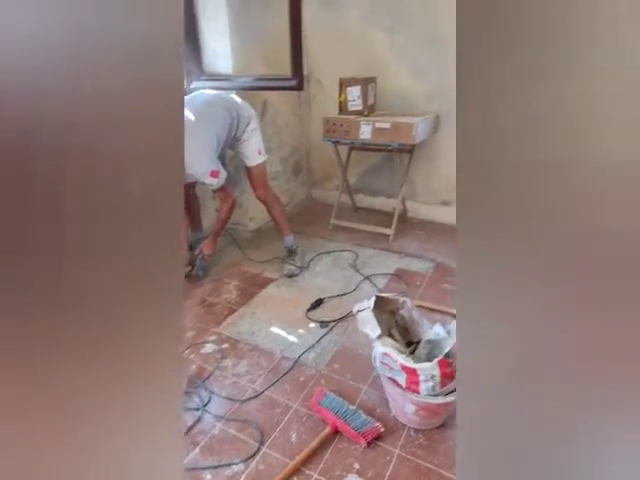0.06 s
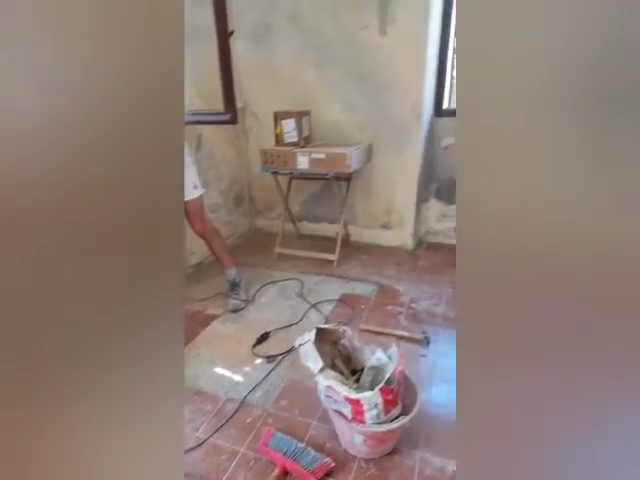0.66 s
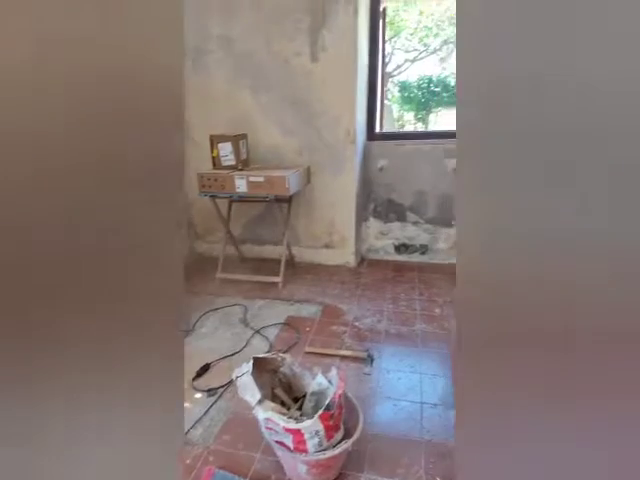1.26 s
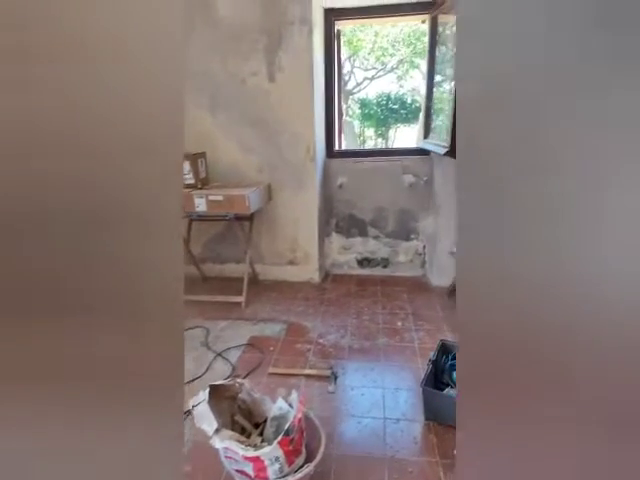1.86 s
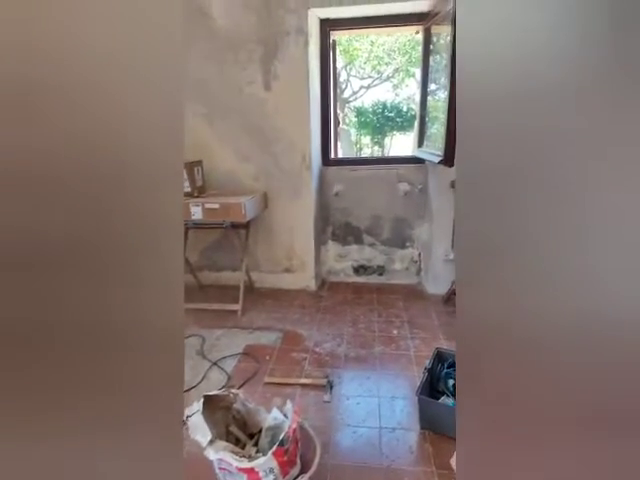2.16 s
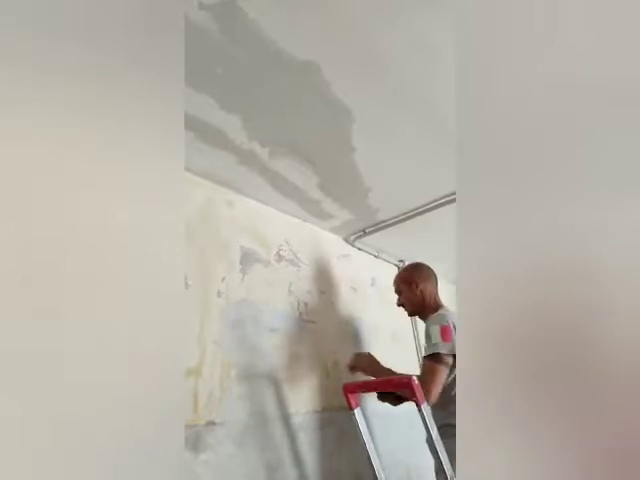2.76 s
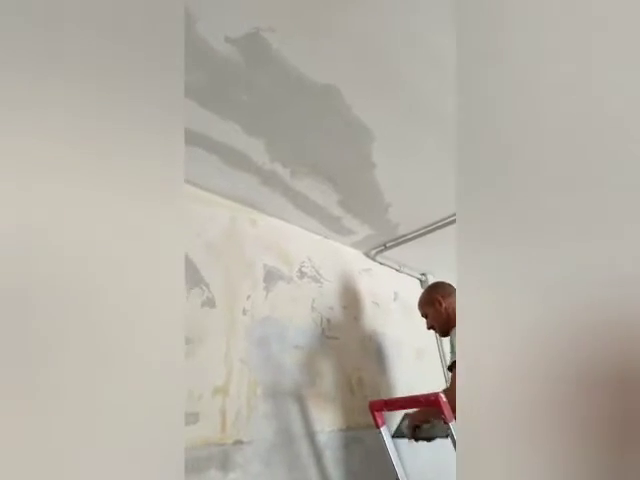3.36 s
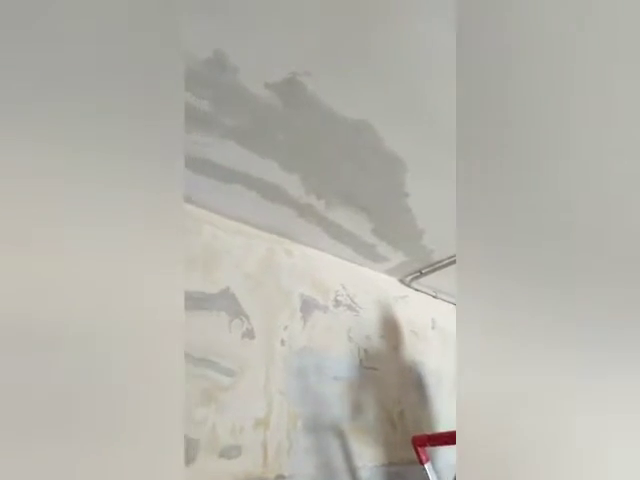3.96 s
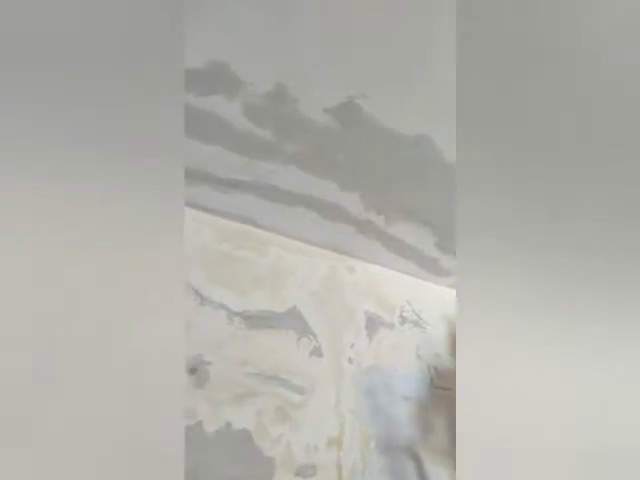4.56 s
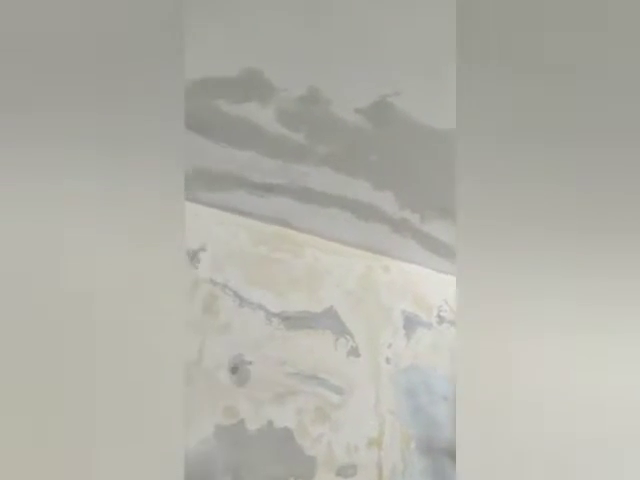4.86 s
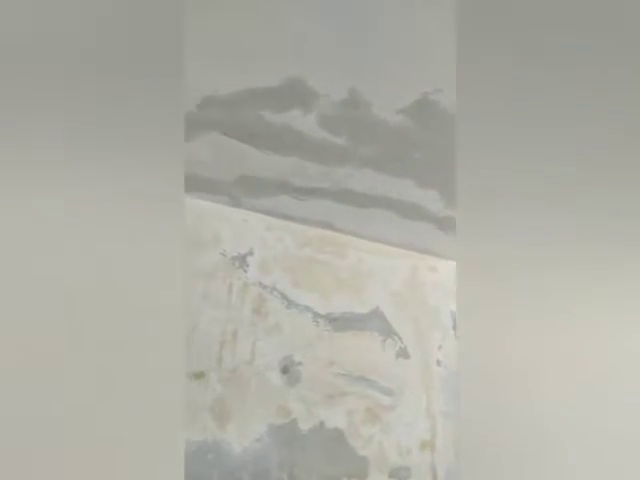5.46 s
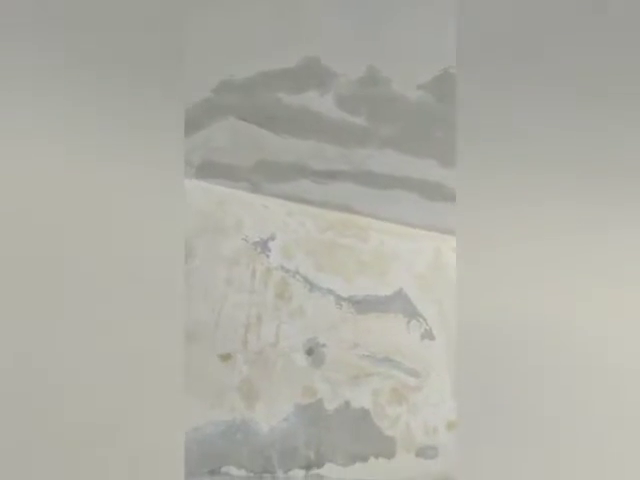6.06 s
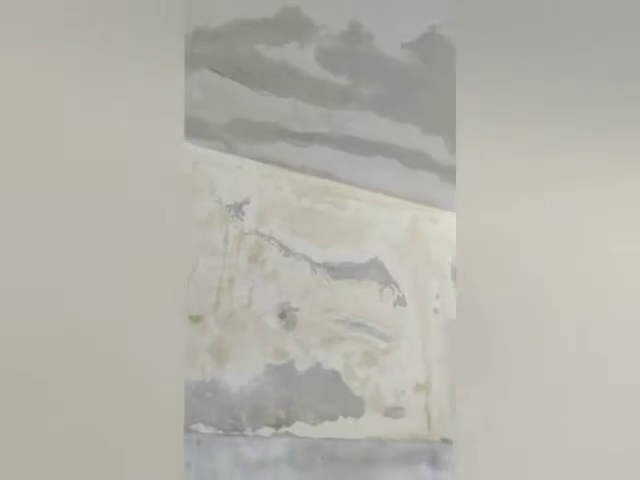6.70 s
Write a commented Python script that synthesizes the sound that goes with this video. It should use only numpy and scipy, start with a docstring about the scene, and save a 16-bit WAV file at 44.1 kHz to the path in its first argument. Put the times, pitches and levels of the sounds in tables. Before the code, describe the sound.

First comes the loud, high whine of an angle grinder under load, with hissing grit and wavering lower tones. It stops dead, and a steel trowel takes over, far softer, spreading plaster in brief rasping strokes and knocking on a tub several times. Bare walls echo each scrape and knock. The last moments hold only very faint scraping, quiet room air and a slight low handling bump.

```python
"""A bare room with a tiled floor: an angle grinder bites in, grit hisses and the steel disc rings in many
shrill modes over a low, uneven howl. A hard cut leads to another bare room, where a steel trowel
knocks against a tub and spreads plaster on the wall in short strokes. Sand hisses under the rasping
blade, and the hard walls echo each stroke and knock over a quiet room tone."""
import sys
import numpy as np
from scipy import signal
from scipy.fft import rfft, irfft, next_fast_len
from scipy.io import wavfile
from scipy.ndimage import uniform_filter1d, map_coordinates

SR = 44100
rng = np.random.default_rng(int(sys.argv[2]) if len(sys.argv) > 2 else 0)


def waveform_to_disk(signal):
    """Save audio, clipped to [-1, 1], as 16-bit WAV at the path in sys.argv[1]."""
    frames = np.transpose(np.atleast_2d(signal))
    scaled = np.clip(frames, -1, 1) * 32767
    samples = np.round(scaled).astype(np.int16)
    wavfile.write(sys.argv[1], SR, samples)


N = 296793


def amp(db):
    """Decibels to gain."""
    return 10 ** (np.asarray(db) / 20)


def unit(x):
    """x at rms 1."""
    return x / np.sqrt(np.mean(x ** 2) + 1e-20)


def clock():
    """The time of each sample in seconds."""
    return np.arange(N) / SR


def along(points, hz):
    """Read (f/Hz, value) breakpoints on a log frequency axis."""
    f, v = np.transpose(points)
    return np.interp(np.log(hz + 1), np.log(f + 1), v)


def automation(points):
    """Join (t/s, value) breakpoints into one value per sample."""
    return np.interp(clock(), *np.transpose(points))


def wobble(rate):
    """A smooth random modulator, rate knots a second."""
    knots = rng.standard_normal(int(N * rate / SR) + 4)
    coarse = np.arange(0, N, 32) / SR
    return np.interp(clock(), coarse, map_coordinates(knots, [coarse * rate]))


def filtered(x, response):
    """x through a filter whose gain is response(hz)."""
    size = next_fast_len(N + SR // 4)
    return irfft(rfft(x, size) * response(np.fft.rfftfreq(size, 1 / SR)), size)[..., :N]


def coloured(x, spectrum):
    """x through an EQ curve, brought to rms 1."""
    return unit(filtered(x, lambda hz: amp(along(spectrum, hz))))


def diffuse(alike):
    """Stereo noise whose sides share the fraction alike of their power."""
    left, right, both = rng.standard_normal((3, N))
    return np.sqrt(1 - alike) * np.array([left, right]) + np.sqrt(alike) * both


def patchy(x, depth_db, size=512, count=9):
    """Brief random resonances, as from a moving source in a room; each spans about count frames."""
    spectra = signal.stft(x, nperseg=size)[2]
    field = uniform_filter1d(rng.standard_normal(spectra.shape[1:]), 2, axis=0)
    field = uniform_filter1d(field, count, axis=1)
    return signal.istft(spectra * amp(depth_db * unit(field)), nperseg=size)[1][:, :N]


def resonance(hz, centre, width):
    """A single causal resonance, gain 1 at its centre."""
    return 1j * hz * width / (centre ** 2 - hz ** 2 + 1j * hz * width)


def panned(x, pan_db):
    """Left louder than right by pan_db."""
    return x * amp([[pan_db / 2], [-pan_db / 2]])


def modes(table, skirt):
    """Yield each mode's frequency and its complex stereo ringing under a steady rain of grit."""
    size = next_fast_len(N // 4 + 1) * 4
    hz = np.fft.rfftfreq(size, 1 / SR)
    blows = rfft(diffuse(alike=0.065), size)
    for centre, width, db in table:
        shape = resonance(hz, centre, width) * resonance(hz, centre, skirt * width) ** 2
        yield centre, amp(db) * np.fft.ifft(blows * shape, size)[:, :N]


def sustained(mode, hold_s=0.028):
    """Friction feeds a mode as fast as it dies, which evens out its strength."""
    power = uniform_filter1d(np.mean(np.abs(mode) ** 2, axis=0), int(hold_s * SR))
    return mode * np.cbrt(power.mean() / (np.abs(power) + 1e-20))


def grit(turn, rub_db=1.1, trim_db=2):
    """Grinding hiss whose colour flickers with brief random resonances."""
    # how hard the disc bites: t/s, level/dB
    bite = [(0.0, -15.5), (0.01, -22.5), (0.12, -19), (0.13, -20.5), (0.35, -23), (0.38, -19.5),
            (0.46, -20.5), (0.5, -18), (0.56, -19.5), (0.9, -20), (1.02, -21.5), (1.59, -19.5), (1.97, -20),
            (1.98, -18.5), (2.58, -20), (2.6, -19)]
    # EQ of the grinding noise: f/Hz, level/dB
    grit_eq = [(25, -10), (60, -12), (120, -17.5), (165, -3.5), (650, -4.5), (1100, 0), (1900, 0),
               (2900, 1), (3450, -7), (4050, -4.5), (4700, -19.5), (5500, -20), (8300, -41), (9200, -17),
               (15000, -19)]
    fine = patchy(diffuse(alike=0.1), depth_db=2.6, size=4096, count=3)
    flickering_hiss = patchy(fine, depth_db=2.0, size=1024, count=4)
    rub = amp(rub_db * np.sin(2 * turn))  # the rim rubs harder twice a turn
    return amp(automation(bite) + trim_db) * coloured(flickering_hiss * rub, grit_eq)


def draught(start_db=-41.5, rise_db_per_s=2.5, flutter_db=2.2):
    """Air thrown by the disc: a fluttering rumble that slowly builds."""
    # EQ of the moving air: f/Hz, level/dB
    draught_eq = [(20, 5.5), (35, -2.5), (65, -13), (120, -17.5), (400, -48)]
    gusts_db = start_db + rise_db_per_s * clock() + flutter_db * wobble(11)
    return amp(gusts_db) * coloured(diffuse(alike=0.18), draught_eq)


def disc(turn, drift_hz=6, bend_hz=7.5, swell_db=1.8, top_db=-26):
    """Grit keeps the disc ringing; its modes bend and swell as the rim binds, and spin adds sidebands."""
    # modes of the steel disc: f/Hz, width/Hz, level/dB
    disc_modes = [(3810, 50, -10), (4385, 60, -8), (4470, 95, -4.5), (4620, 50, -7), (4928, 42, -3),
                  (5061, 36, -2), (5383, 42, -2.5), (5540, 36, .5), (6072, 48, 1), (6710, 48, 3.5),
                  (6795, 70, 1.5), (6980, 90, -15), (7215, 70, -10), (7480, 95, -3), (7605, 48, 3),
                  (8520, 44, 2.5), (9582, 48, -8), (10385, 80, -17), (10766, 60, -8), (11980, 70, -16),
                  (12480, 75, -14.5), (13385, 60, -14.5), (14720, 110, -15)]
    # splits between the low, main, shrill and top groups of modes: f/Hz
    borders = [5800, 8000, 9000]
    # fader rides of the low, main and shrill groups: t/s, level/dB
    low_ride = [(0, -18.5), (.4, -19.5), (.6, -20.5), (.85, -18), (1.2, -19.5), (1.65, -18), (2.0, -20),
                (2.6, -18)]
    main_ride = [(0, -15.5), (.12, -14), (.3, -14), (.47, -12.5), (.8, -14), (1.1, -13.5), (1.42, -16),
                 (1.68, -14), (2.6, -15)]
    shrill_ride = [(0, -21.5), (.55, -23.5), (.83, -17), (1.15, -17), (1.35, -23), (1.7, -22.5),
                   (1.95, -22), (2.3, -19.5), (2.43, -16), (2.6, -17.5)]
    drift = drift_hz * wobble(3.6)
    groups = np.zeros((len(borders) + 1, 2, N))
    for centre, mode in modes(disc_modes, skirt=3.0):
        bend = 2 * np.pi * np.cumsum(drift + bend_hz * wobble(9)) / SR
        angle = turn + rng.uniform(0, 2 * np.pi)
        swing = .22 * np.sin(angle) + .08 * np.sin(2 * angle)  # radians, once and twice a turn
        ringing = (sustained(mode) * np.exp(1j * (bend + swing))).real
        groups[np.searchsorted(borders, centre)] += amp(swell_db * wobble(3.9)) * ringing
    levels_db = [automation(low_ride), automation(main_ride), automation(shrill_ride), top_db]
    ring = sum(amp(db) * unit(group) for db, group in zip(levels_db, groups))
    return ring.std() * unit(patchy(ring, depth_db=2.1, size=1024, count=4))


def guard(howl_db=-26.5, wander_db=3.5):
    """The low modes of disc and guard howl unevenly, and single tones sing out when the rim binds."""
    # low modes of disc and guard: f/Hz, width/Hz, level/dB
    guard_modes = [(802, 20, -2), (826, 20, -5), (902, 22, -3), (1131, 16, -1), (1160, 24, -1),
                   (1256, 16, -1.5), (1488, 25, -5), (1701, 28, -6), (1826, 14, -1), (1946, 12, 1),
                   (2189, 14, -3.5), (2604, 16, -5)]
    # tones of the binding rim: t/s, half length/s, f/Hz, level/dB
    binds = [(0.15, .06, 826, -35), (0.15, .06, 1165, -32.5), (0.16, .05, 1256, -33),
             (0.40, .055, 826, -30.5), (0.40, .055, 1165, -28.5), (0.61, .06, 1256, -32),
             (0.88, .09, 1351, -33.5), (0.89, .09, 1131, -25), (0.90, .075, 902, -28),
             (0.96, .13, 802, -32.5), (1.22, .05, 1256, -30), (1.29, .03, 802, -34),
             (1.37, .09, 1256, -32.5), (1.44, .055, 802, -29.5), (1.46, .08, 1150, -34),
             (1.60, .05, 1946, -30), (1.72, .075, 802, -29), (1.81, .04, 1701, -31.5),
             (2.02, .05, 1946, -33), (2.03, .04, 1600, -31.5), (2.05, .075, 1826, -28.5),
             (2.18, .13, 1140, -31.5), (2.25, .15, 1701, -30.5), (2.36, .05, 802, -32.5),
             (2.53, .06, 802, -33.5), (2.54, .08, 1701, -32)]
    t = clock()
    howl = sum(amp(wander_db * wobble(5.4)) * mode.real for _, mode in modes(guard_modes, skirt=6))
    phases = rng.uniform(0, 2 * np.pi, (len(binds), 2, 1))
    song = np.zeros((2, N))
    for (peak_s, half_s, hz, db), phase in zip(binds, phases):
        near = np.abs(t - peak_s) < np.pi * half_s
        swell = amp(db) * np.exp(-((t[near] - peak_s) / half_s) ** 2)
        ear_phase = phase[0] + phase / 4  # the two ears are a little out of step
        song[:, near] += swell * np.sin(2 * np.pi * hz * t[near] + ear_phase)
    return amp(howl_db) * unit(howl) + np.sqrt(2) * song


def grinder(spin_hz=112.5, waver_hz=2.2):
    """The whole tool, its spin wavering under load, spread across the stereo field by frequency."""
    # stereo balance of the grinder: f/Hz, left over right/dB
    balance = [(60, 2), (110, 9), (200, 1), (380, 6), (700, 1.5), (1280, 6.5), (2370, 0.5), (4370, 1),
               (8070, -2.5), (14900, 1.5)]
    turn = 2 * np.pi * np.cumsum(spin_hz + waver_hz * wobble(15)) / SR
    tool = grit(turn) + draught() + disc(turn) + guard()
    return filtered(tool, lambda hz: amp(np.outer([.5, -.5], along(balance, hz))))


def room_tone(level_db=-60.0, wander_db=2.2):
    """The still air of the house: a faint, low noise that wavers in level and colour."""
    # EQ of the still air: f/Hz, level/dB
    air_eq = [(10, 6), (30, 0.5), (65, -9.5), (120, -13), (180, -8), (260, -10.5), (335, -7), (420, -12),
              (550, -16.5), (1200, -21), (3000, -33), (7000, -27.5), (9000, -34), (11000, -56.5)]
    gain = amp(level_db + wander_db * wobble(10.0))
    air = patchy(diffuse(alike=0.45), depth_db=3.5, size=2048, count=4)
    return gain * coloured(air, air_eq)


def sand(grain_db=0.5, stick_db=0.7):
    """Sand dragged along: noise roughened quickly by its grains and more slowly by sticking."""
    drag = patchy(diffuse(alike=0.049), depth_db=5.5)
    return drag * amp(grain_db * wobble(650) + stick_db * wobble(60))


def crunch(per_s):
    """Single coarse grains of sand cracking under the blade, at rms 1."""
    return unit((rng.random(N) < per_s / SR) * rng.standard_normal((2, N)))


def pressure(age, length, swell_db, attack_s=0.035, release_s=0.04, ease_share=0.18):
    """One stroke: the blade lands (slower on long strokes), presses ever harder or softer, and lifts."""
    landing = np.clip(age / max(attack_s, ease_share * length), 0, 1)
    pressing = amp(swell_db * (np.clip(age / length, 0, 1) - .5))
    lifting = np.exp(-np.maximum(age - length, 0) / release_s)
    return landing * pressing * lifting


def trowel(crunch_db=-4, rasp_lag_s=0.0076, echo_db=-2.5):
    """Sand hisses first, then the blade rasps on the wall, ringing most in the early, hard strokes."""
    # trowel strokes: t/s, length/s, hiss level/dB, rasp level/dB, swell/dB, blade ring/ratio
    strokes = [(2.42, 0.074, -44, -46, 0, 1.1), (2.643, 0.079, -40, -37, 9.5, 1.9),
               (2.765, 0.13, -53, -46.5, 0, 0.78), (3.17, 0.29, -68.5, -66, -6, .45),
               (3.449, 0.048, -60, -55.5, 4, 0.55), (3.503, 0.19, -47, -50, -5, 0.15),
               (4.04, 0.083, -41.5, -48, 4.5, 0.15), (4.502, 0.048, -38, -44, 2, 0.22),
               (4.858, 0.18, -40, -44.5, 4, 0.12), (5.852, 0.44, -68, -69, -1.5, .1),
               (6.287, .43, -75, -80, 6, 0.4)]
    # EQs of the hissing sand and the rasping blade: f/Hz, level/dB
    hiss_eq = [(2000, -53), (3800, -9.5), (5400, -6), (7000, 1), (8000, -3.5), (9000, -10.5), (9700, -21),
               (12000, -24), (15000, -26.5)]
    rasp_eq = [(100, -37.5), (300, -13), (700, -7.5), (1400, 0.5), (2100, -1), (3200, -5), (4500, -4.5),
               (7000, -28.5)]
    # modes of the steel blade: f/Hz, width/Hz, level/dB
    blade = [(686, 22, 4), (870, 18, -2), (1933, 18, 0), (2013, 45, 4), (2105, 45, 1.5), (2509, 30, -4),
             (2832, 20, -4), (3822, 35, -2)]
    t = clock()
    grains = sand() + amp(crunch_db) * crunch(per_s=260)
    hiss = panned(coloured(grains, hiss_eq), pan_db=-3.0)
    rasp = panned(coloured(sand(), rasp_eq), pan_db=4.0)
    ringing = filtered(rasp, lambda hz: sum(amp(db) * resonance(hz, f, width) for f, width, db in blade))
    scrape = np.zeros((2, N))
    for start, length, hiss_db, rasp_db, swell_db, ring in strokes:
        steel = unit(rasp + ring * ringing)
        scrape += amp(hiss_db) * pressure(t - start, length, swell_db) * hiss
        scrape += amp(rasp_db) * pressure(t - start - rasp_lag_s, length, swell_db) * steel
    return scrape + amp(echo_db) * wall_echo(scrape)


def wall_echo(x):
    """Reverb of bare walls: each frequency dies at its own speed, with a separate tail for each ear."""
    # decay of the room: f/Hz, t60/s
    decay = [(100, 0.8), (500, 0.96), (1500, 0.85), (4000, 0.7), (7500, 0.67), (14000, 0.18)]
    hz, t, spectra = signal.stft(rng.standard_normal((2, SR)), SR, nperseg=256)
    fade = amp(-60 * t / along(decay, hz)[:, None])
    tail = signal.istft(spectra * fade, SR, nperseg=256)[1]
    return signal.fftconvolve(x, tail / np.linalg.norm(tail[0]), axes=1)[:, :N]


def knocks(thud_t60=0.081, click_t60=0.039, attack_s=0.0044, echo_db=5.0):
    """Dull thuds of the tub with a click of steel, heard mostly through the room."""
    # trowel hits on tub and wall: t/s, thud level/dB, click level/dB
    hits = [(2.651, -61, -28.5), (3.413, -45, -48), (3.952, -56, -38.5), (4.419, -60, -44),
            (4.443, -52, -44), (4.798, -39, -38), (4.845, -43.5, -55), (6.603, -62, -53.5)]
    # EQs of the thud and the click: f/Hz, level/dB
    thud_eq = [(60, -31.5), (170, 6.5), (550, 3), (1100, 1), (2200, -5), (5000, -31)]
    click_eq = [(600, -3), (1500, 9), (4000, 7), (7500, 8.5), (9500, -8), (15000, -40)]
    t = clock()
    thud, click = np.zeros((2, N))
    for start, thud_db, click_db in hits:
        age = np.maximum(t - start, 0)
        rise = 1 - np.exp(-age / attack_s)  # wet plaster softens the contact
        thud += rise * amp(thud_db - 60 * age / thud_t60)
        click += rise * amp(click_db - 60 * age / click_t60)
    blows = thud * coloured(diffuse(alike=0.61), thud_eq) + click * coloured(diffuse(alike=.3), click_eq)
    return blows + amp(echo_db) * wall_echo(blows)


def hand_bump(peak_s=6.715, half_s=.035, level_db=-55):
    """One soft, low bump of a hand."""
    # EQ of the handling noise: f/Hz, level/dB
    bump_eq = [(20, 1), (42, 9), (80, -11), (220, 1), (500, -22), (1500, -53)]
    swell = amp(level_db) * np.exp(-((clock() - peak_s) / half_s) ** 2)
    return swell * coloured(diffuse(alike=0.75), bump_eq)


def scene(cut_s=2.6175, crossfade_s=0.0023):
    """The grinder, then a hard cut to the plastering."""
    grinding = grinder()
    plastering = trowel() + knocks() + panned(room_tone() + hand_bump(), pan_db=5.5)
    before = np.clip((cut_s - clock()) / crossfade_s + .5, 0, 1)
    return before * grinding + (1 - before) * plastering


def record(dry):
    """Clip the peaks at full scale, then apply a steep low-pass."""
    top_hz = 15400
    return filtered(np.clip(dry, -1, 1), lambda hz: 1 / (1 + (hz / top_hz) ** 300))


dry = scene()
out = record(dry)
waveform_to_disk(out)
```